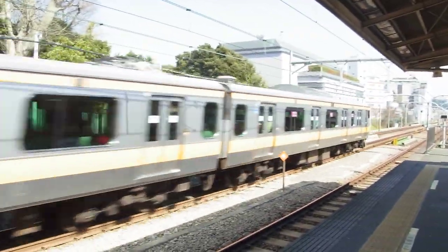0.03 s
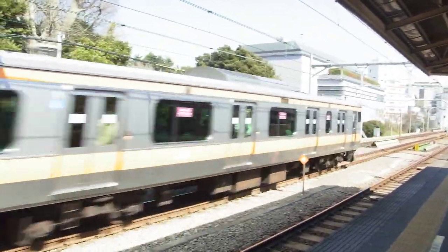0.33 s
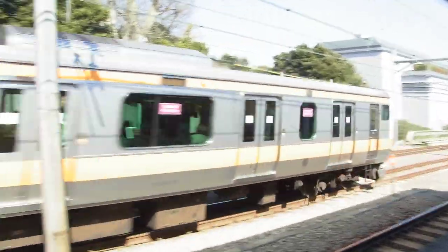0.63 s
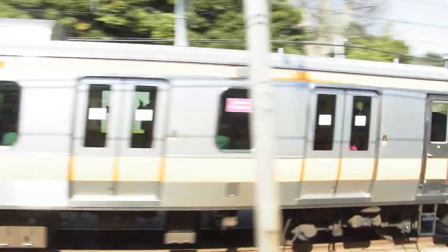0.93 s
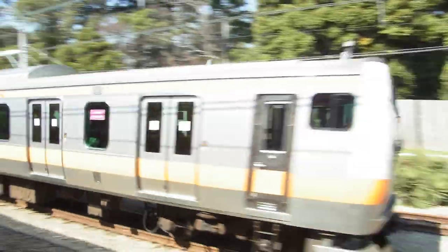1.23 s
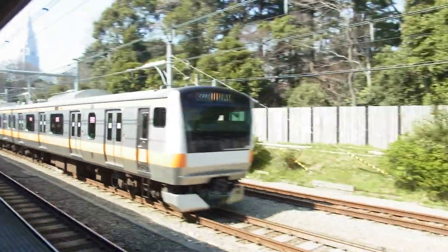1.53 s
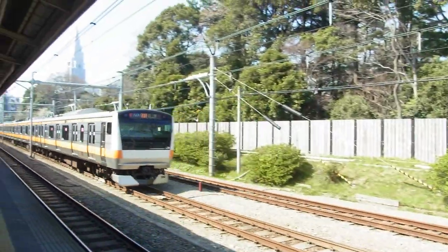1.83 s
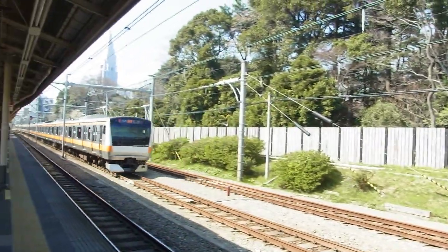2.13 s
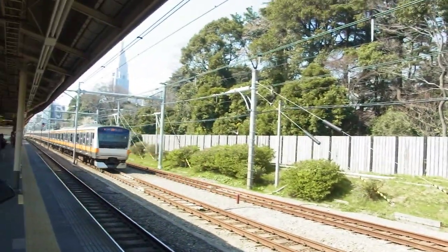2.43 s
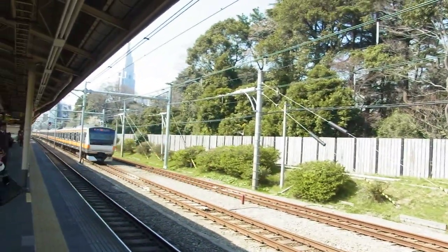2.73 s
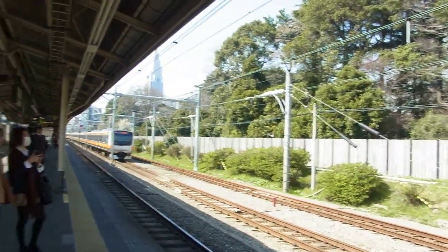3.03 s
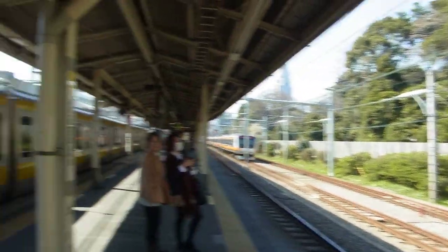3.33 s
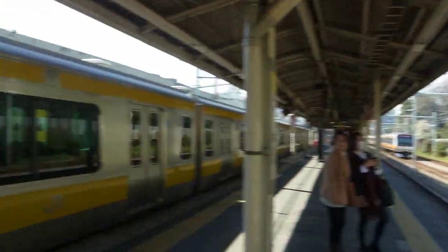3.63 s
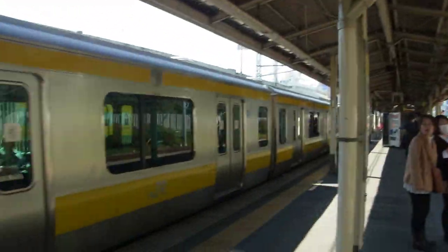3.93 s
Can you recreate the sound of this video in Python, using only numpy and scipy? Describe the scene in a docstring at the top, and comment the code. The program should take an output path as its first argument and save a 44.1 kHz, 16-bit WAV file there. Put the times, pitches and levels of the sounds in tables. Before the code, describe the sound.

An electric train rolls past an open platform, its wheels howling raggedly over rumble, hum and a steely rush. Brief wheel squeals come near 0.2, 0.6 and 1.4 seconds, and twice around 2.5. The howl sinks slightly in pitch as the last car passes, and from about 2 seconds everything fades. A purer, distant howl, faint ringing rails and a thin hiss linger until 4 seconds.

```python
"""An electric commuter train rolls past an open station platform and draws away.
Its wheels run over rippled rail and howl: a ragged tone with overtones that sinks as the last car goes by.
Single wheels cry out; a purer howl carries back along the line. Underneath are rolling rumble, the
running gear's hum and the rush of steel on steel. Rails ring; a thin hiss and a faint whine linger."""
import sys
import numpy as np
from scipy import signal
from scipy.io import wavfile
from scipy.ndimage import uniform_filter1d

SR = 44100
rng = np.random.default_rng(int(sys.argv[2]) if len(sys.argv) > 2 else 0)


def persist_wave(psi):
    """Save psi, clipped to +-1, as 16-bit WAV."""
    counts = np.round(np.clip(psi, -1, 1) * 32767).astype(np.int16)
    wavfile.write(sys.argv[1], SR, np.atleast_2d(counts).T)


N = 176400
TIME_S = np.arange(N) / SR


def from_db(db):
    """Decibels to gain."""
    return 10 ** (np.asarray(db) / 20)


def rms_one(x):
    """Scale to unit rms."""
    return x / np.sqrt(np.mean(np.abs(x) ** 2) + 1e-20)


def in_time(rows):
    """Each column of a curve at every sample."""
    times_s, *columns = np.transpose(rows)
    return [np.interp(TIME_S, times_s, column) for column in columns]


def at_hz(spectrum, hz):
    """Spectrum level in dB on a log-frequency axis; -30 dB/octave beyond its ends."""
    points_hz, db = np.transpose(spectrum)
    octaves_outside = max(0, np.log2(points_hz[0] / hz), np.log2(hz / points_hz[-1]))
    return np.interp(np.log(hz), np.log(points_hz), db) - 30 * octaves_outside


def swell(peak_s, span_s):
    """Bell curve of height 1, down to 1/e at span_s either side of the peak."""
    return np.exp(-((TIME_S - peak_s) / span_s) ** 2)


def pan(db):
    """Channel gains for a left-minus-right level difference."""
    return from_db(np.array([[1], [-1]]) * db / 2)


def stereo(mid, side, correlation):
    """Two channels with a given correlation."""
    side_pair = side * np.array([[1], [-1]])
    return np.sqrt((1 + correlation) / 2) * mid + np.sqrt((1 - correlation) / 2) * side_pair


def drift(hz):
    """Slow random motion, rms 1: noise through a double one-pole low-pass at SR / 8."""
    pole = np.exp(-16 * np.pi * hz / SR)
    slow = signal.lfilter([1], [1, -2 * pole, pole * pole], rng.standard_normal(N // 8 + 6002))[6000:]
    return np.interp(np.arange(N) / 8, np.arange(len(slow)), rms_one(slow))


def beating(width_hz):
    """Complex envelope of many sources spread over a band; rms 1."""
    lowpass = signal.butter(2, np.clip(width_hz / 2, .5, 1000), fs=SR / 8, output="sos")
    re, im = signal.sosfilt(lowpass, rng.standard_normal((2, N // 8 + 4002)))[:, 4000:]
    return rms_one(np.interp(np.arange(N) / 8, np.arange(len(re)), re + 1j * im))


def ragged_tone(hz, width_hz, correlation):
    """Many sources near one pitch, beating against each other; stereo, rms 1."""
    carrier = np.exp(2j * np.pi * np.cumsum(hz * np.ones(N)) / SR)
    mid = (beating(width_hz) * carrier).real
    side = (beating(width_hz) * carrier).real
    return rms_one(stereo(mid, side, correlation))


def evened(sound, steadiness):
    """Remove a share (0 to 1) of the slow level variation."""
    power = uniform_filter1d((sound ** 2).mean(0), size=5292)
    power = uniform_filter1d(power, size=3528) + 1e-9
    return rms_one(sound / power ** (steadiness / 2)) * np.sqrt(power.mean())


# Howl pitch: t/s, fundamental/Hz, overtone spacing/Hz
HOWL_PITCH = [(0, 654.6, 695), (.35, 672.7, 691), (.65, 669, 688), (.9, 655, 675.8), (1.4, 641.6, 653.7),
              (2.1, 645.6, 646.6), (3, 645.3, 636.5), (4, 640, 637)]
# Fundamental envelope: t/s, level/dB
FUNDAMENTAL_ENVELOPE = [(0.0, -14), (0.3, -14.5), (0.6, -17), (0.9, -14), (1.2, -16), (1.5, -16.5),
                        (1.75, -15), (1.95, -16.5), (2.1, -15.5), (2.3, -21), (2.45, -21.5), (2.58, -18),
                        (2.75, -25), (2.9, -27), (3.1, -24), (3.35, -26.5), (3.65, -26.5), (4.0, -32.5)]
# Overtone envelope: t/s, level/dB
OVERTONE_ENVELOPE = [(0.0, -22.5), (0.22, -24), (0.42, -21.5), (0.6, -20.5), (0.75, -21.5), (0.95, -20.5),
                     (1.15, -19.5), (1.4, -19), (1.58, -22.5), (1.82, -24.5), (2.0, -21.5), (2.22, -23),
                     (2.42, -27), (2.56, -25.7), (2.75, -29.5), (3.2, -31.5), (3.6, -31), (4.0, -38)]
# Bands around the fundamental: f/fundamental, width/Hz, relative level/dB
FUNDAMENTAL_BANDS = [(.988, 23.8, -5), (1.008, 78.5, -2.5), (1.1, 113, -14.5), (1.23, 139, -13.5)]
# Overtones: f/spacing, width/Hz, relative level/dB
OVERTONE_BANDS = [(2.01, 23, -11), (2.01, 163, -5), (2.98, 150, -9.5), (2.94, 380, -7), (4.02, 212, -12),
                  (4.9, 530, -24.5)]
# Throbs of the fundamental: t/s, span/s, gain/dB
HOWL_THROBS = [(0.877, 0.019, 2), (1.493, 0.019, 7.5), (1.76, 0.017, 3.5), (1.813, 0.017, -5),
               (2.642, 0.013, 3), (3.143, 0.01, 3.5), (3.195, 0.014, 1), (3.603, 0.021, 4)]


def rail_howl():
    """Every wheel crosses the ripples of the rail at nearly the same rate."""
    pitch_hz, spacing_hz = in_time(HOWL_PITCH)
    low_db, = in_time(FUNDAMENTAL_ENVELOPE)
    high_db, = in_time(OVERTONE_ENVELOPE)
    throb_db = sum(db * swell(peak_s, span_s) for peak_s, span_s, db in HOWL_THROBS)
    low = sum(from_db(db) * ragged_tone(ratio * pitch_hz, width_hz, correlation=.89)
              for ratio, width_hz, db in FUNDAMENTAL_BANDS)
    high = sum(from_db(db) * ragged_tone(ratio * spacing_hz, width_hz, correlation=.5)
               for ratio, width_hz, db in OVERTONE_BANDS)
    fundamental = from_db(low_db + throb_db) * evened(low, steadiness=.5)
    overtones = from_db(high_db) * high * pan(db=-3)
    return fundamental + overtones


# Left-right likeness of the broad noise: f/Hz, correlation
NOISE_CORRELATION = [(60, .96), (200, 0.98), (400, 0.97), (750, 0.65), (1300, 0.67), (2400, -0.41),
                     (4400, -0.061), (15000, -0.066)]


def noise_bands():
    """Flickering stereo noise bands, the upper ones drifting right: (f/Hz, width/Hz, sound of rms 1)."""
    flicker_db, start_pan_db, pan_db_per_s = 1.16, -.1, -.35
    treble_pan_db = start_pan_db + pan_db_per_s * TIME_S
    edges_hz = np.r_[np.geomspace(20, 2500, 19), np.linspace(2500, 16000, 19)[1:]]
    points_hz, correlations = np.transpose(NOISE_CORRELATION)
    white = rng.standard_normal((2, 2, N))
    bands = []
    for k, (low_hz, high_hz) in enumerate(zip(edges_hz, edges_hz[1:])):
        hz = np.sqrt(low_hz * high_hz)
        bandpass = signal.butter(2, [low_hz, high_hz], "band", fs=SR, output="sos")
        mid, side = signal.sosfilt(bandpass, white[k % 2])
        sound = stereo(mid, side, np.interp(np.log(hz), np.log(points_hz), correlations))
        sound *= pan(treble_pan_db * min(hz / 1000, 1))
        sound *= from_db(flicker_db * drift(hz=10))
        bands.append((hz, high_hz - low_hz, rms_one(sound)))
    return bands


def coloured(bands, layers):
    """Noise with the summed power of several layers, each (spectrum, level/dB)."""
    band_powers = [0] * len(bands)
    for spectrum, db in layers:
        gains = np.array([from_db(at_hz(spectrum, hz)) * np.sqrt(width_hz) for hz, width_hz, _ in bands])
        shares = gains ** 2 / np.sum(gains ** 2)
        layer_power = from_db(db) ** 2
        band_powers = [power + share * layer_power for power, share in zip(band_powers, shares)]
    return sum(sound * np.sqrt(power) for (_, _, sound), power in zip(bands, band_powers))


# Rolling envelopes, before trim: t/s, rumble/dB, rush/dB, hiss/dB
ROLLING_ENVELOPES = [(0.0, -26.5, -28.5, -34), (0.25, -24, -29.5, -35), (0.45, -27.0, -28, -35.0),
                     (0.65, -26.5, -29.5, -34), (0.85, -30, -29, -36), (1.2, -28, -27, -32.5),
                     (1.42, -31.5, -28.5, -36.5), (1.6, -31.5, -31.5, -36), (1.85, -31.5, -32.5, -37.0),
                     (2.0, -30, -33, -35), (2.2, -29.5, -34.5, -36.5), (2.5, -33.5, -37, -38),
                     (2.8, -34.3, -40.5, -38), (3.2, -37.5, -42.5, -40.5), (3.6, -40, -46, -43),
                     (4.0, -39.5, -49.5, -45.5)]
# Flares of rush and hiss: t/s, span/s, gain/dB
TREBLE_FLARES = [(0.245, 0.044, 2), (1.457, 0.043, 1.5), (1.984, 0.092, 1.5), (2.396, 0.024, 2.5)]
# Wheel and track rumble: f/Hz, relative density/dB
RUMBLE_SPECTRUM = [(100, -11), (180, -9.5), (270, -4), (420, 1), (560, -1), (820, -3), (1100, 0),
                   (1600, -7.5), (2400, -8), (3300, -12), (4500, -29.5), (7000, -49)]
# Steel-on-steel rush: f/Hz, relative density/dB
RUSH_SPECTRUM = [(900, -12), (2000, -11), (3000, 2.5), (3900, 2.5), (5300, -4.5), (6200, -1.5), (8000, -7),
                 (10000, -17.5), (15000, -29)]
# Thin hiss: f/Hz, relative density/dB
HISS_SPECTRUM = [(4000, -28), (7500, -9), (8700, -2), (9700, -2.5), (10700, 0.5), (12500, -1.5),
                 (14700, -5), (15600, -14)]
# Station and ground drone: f/Hz, relative density/dB
DRONE_SPECTRUM = [(22, -20), (35, -9), (55, 0.5), (80, -1), (105, 3.5), (170, 4), (260, 0.5), (600, -23),
                  (2000, -37)]


def rolling_noise():
    """Rumble of wheels and track, contact rush and lingering hiss over the station's steady drone."""
    rumble_trim_db, rush_trim_db, hiss_trim_db, drone_db = 5.5, 2, .5, -38
    rumble_db, rush_db, hiss_db = in_time(ROLLING_ENVELOPES)
    flare_db = sum(db * swell(peak_s, span_s) for peak_s, span_s, db in TREBLE_FLARES)
    flutter_db = .5 * drift(hz=29)   # wheel roughness
    layers = [(RUMBLE_SPECTRUM, rumble_db + rumble_trim_db),
              (RUSH_SPECTRUM, rush_db + rush_trim_db + flare_db + flutter_db),
              (HISS_SPECTRUM, hiss_db + hiss_trim_db + flare_db + flutter_db),
              (DRONE_SPECTRUM, drone_db)]
    return coloured(noise_bands(), layers)


# Running gear envelope: t/s, level/dB
GEAR_ENVELOPE = [(0.0, -26.5), (0.5, -34), (0.75, -34.5), (1.0, -30.5), (1.5, -32.5), (2.0, -39.3),
                 (2.5, -39), (3.0, -39), (4.0, -51.5)]
# Rough partials: f/hum pitch, width/Hz, relative level/dB
GEAR_PARTIALS = [(1, 31, -7.5), (1.66, 30, -13.5), (2.04, 39.6, -6)]


def gear_hum():
    """Running gear under the cars: a clean core in rough partials, sagging as the train recedes."""
    start_hz, sag_hz_per_s, waver_hz, core_db = 217, 3, 1.5, -3.5
    level_db, = in_time(GEAR_ENVELOPE)
    pitch_hz = start_hz - sag_hz_per_s * TIME_S
    core_hz = pitch_hz + waver_hz * drift(hz=4.9)
    core = np.sqrt(2) * np.sin(2 * np.pi * np.cumsum(core_hz) / SR)
    rough = sum(from_db(db) * ragged_tone(ratio * pitch_hz, width_hz, correlation=.93)
                for ratio, width_hz, db in GEAR_PARTIALS)
    return from_db(level_db) * (from_db(core_db) * core + evened(rough, steadiness=.6))


# Platform hum: f/Hz, width/Hz, level/dB
PLATFORM_HUM = [(102.6, 14, -48.5)]


def platform_tones():
    """A faint hum and a very high whine that stay around the platform."""
    whine_hz, whine_db = 15734, -62
    hum = sum(from_db(db) * evened(ragged_tone(hz, width_hz, correlation=.98), steadiness=.7)
              for hz, width_hz, db in PLATFORM_HUM)
    whine = np.sqrt(2) * np.sin(2 * np.pi * whine_hz * TIME_S)
    return hum + from_db(whine_db) * whine


# High rail resonances: f/Hz, width/Hz, level/dB re hiss envelope
HIGH_RAIL_MODES = [(8560, 300, -18), (10580, 540, -16), (11100, 400, -21)]
# Rail resonances behind the train: f/Hz, width/Hz, peak level/dB
LATE_RAIL_MODES = [(3060, 227, -45), (3490, 260, -46), (4180, 600, -49.5)]


def ringing_rails():
    """Rail resonances: some follow the hiss, others swell once the train has gone by."""
    _, _, hiss_db = in_time(ROLLING_ENVELOPES)
    high = sum(from_db(db) * ragged_tone(hz, width_hz, correlation=0)
               for hz, width_hz, db in HIGH_RAIL_MODES)
    late = sum(from_db(db) * ragged_tone(hz, width_hz, correlation=0)
               for hz, width_hz, db in LATE_RAIL_MODES)
    return (from_db(hiss_db) * high + swell(peak_s=3.284, span_s=.59) * late) * pan(db=-4.5)


# Wheel cries: t/s, span/s, f/Hz, peak level/dB
CRIES = [(0.235, .04, 2210, -26), (0.597, .035, 1410, -18.5), (1.39, 0.053, 1288, -26),
         (2.385, 0.029, 1197, -26.5), (2.55, 0.028, 1422, -28)]


def wheel_cries():
    """Single wheels cry out briefly above the howl."""
    cries = np.zeros((2, N))
    for peak_s, span_s, hz, db in CRIES:
        tone = evened(ragged_tone(hz, width_hz=80, correlation=.5), steadiness=1)
        cries += from_db(db) * swell(peak_s, span_s) * tone
    return cries * pan(db=-3)


# Passing tones: t/s, span/s, f/Hz, width/Hz, peak level/dB
TONE_SWELLS = [(0.28, 0.26, 440, 38, -31.5), (2.79, 0.63, 412, 4.2, -40), (2.5, .55, 8260, 200, -53)]


def passing_tones():
    """Two faint low tones and a high sizzle rise and fade as the train moves on."""
    tones = np.zeros((2, N))
    for peak_s, span_s, hz, width_hz, db in TONE_SWELLS:
        tone = evened(ragged_tone(hz, width_hz, correlation=.96), steadiness=.59)
        tones += from_db(db) * swell(peak_s, span_s) * tone
    return tones


# Distant howl: f/Hz, width/Hz, peak level/dB
FAR_HOWL_BANDS = [(634, 10.5, -35), (658.5, 15, -32.5), (1291, 39, -38), (1275, 11, -45)]


def far_howl():
    """The howl carries back along the line, purer because all wheels recede alike."""
    tones = sum(from_db(db) * evened(ragged_tone(hz, width_hz, correlation=.72), steadiness=.38)
                for hz, width_hz, db in FAR_HOWL_BANDS)
    return tones * swell(peak_s=2.38, span_s=1.84) * pan(db=1)


def scene():
    """Train and station together."""
    return (rail_howl() + rolling_noise() + gear_hum() + platform_tones()
            + ringing_rails() + wheel_cries() + passing_tones() + far_howl())


def record(dry):
    """Steep low-pass on the top treble."""
    cutoff_hz = 15780
    return signal.sosfilt(signal.ellip(12, .1, 80, cutoff_hz, fs=SR, output="sos"), dry)


dry = scene()
out = record(dry)
persist_wave(out)
```